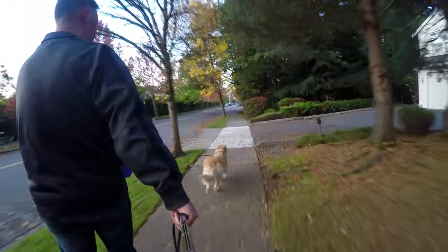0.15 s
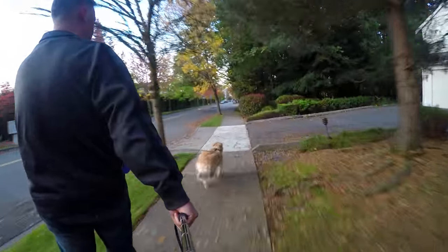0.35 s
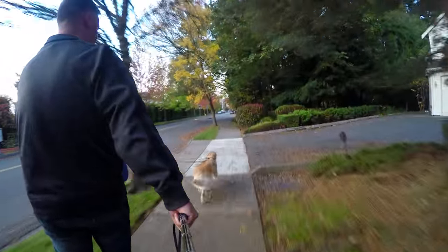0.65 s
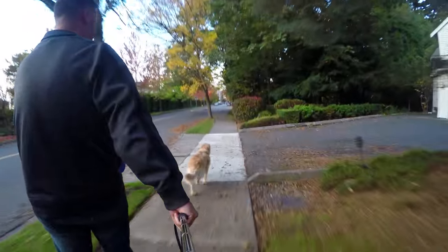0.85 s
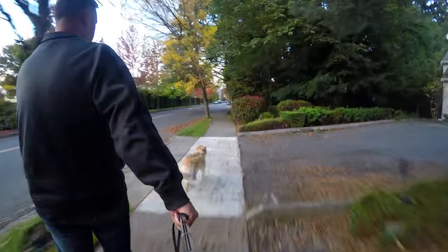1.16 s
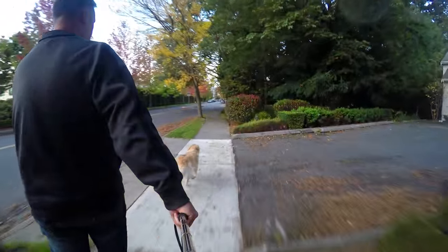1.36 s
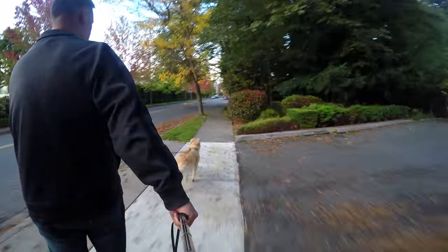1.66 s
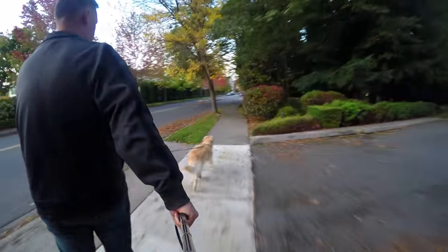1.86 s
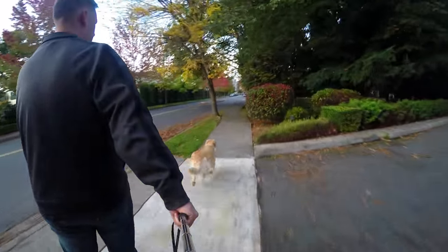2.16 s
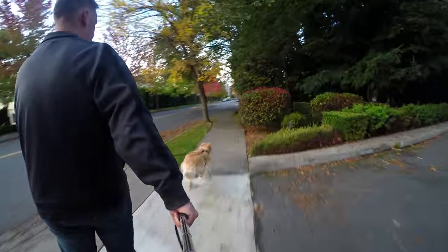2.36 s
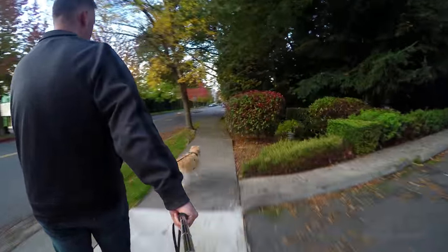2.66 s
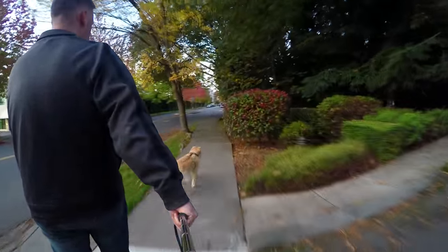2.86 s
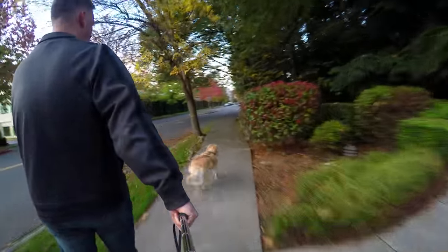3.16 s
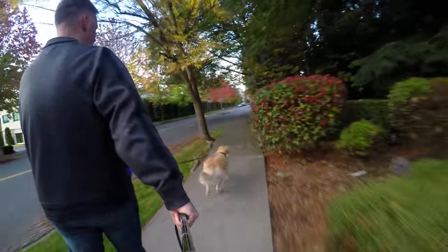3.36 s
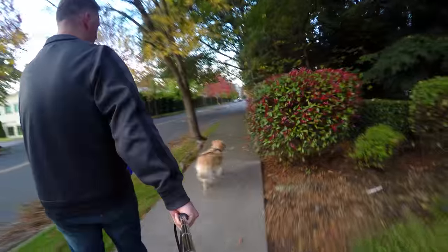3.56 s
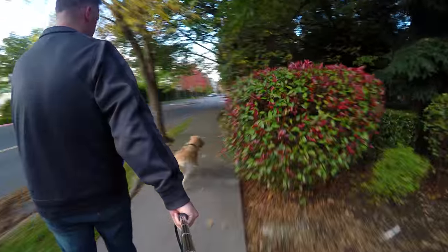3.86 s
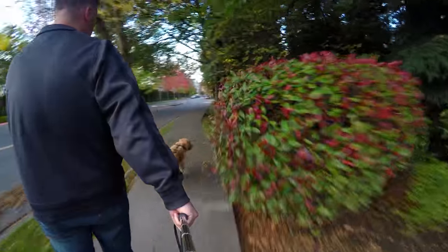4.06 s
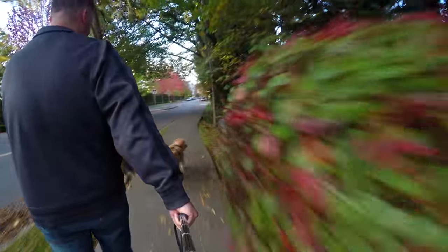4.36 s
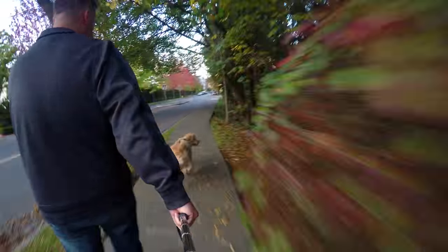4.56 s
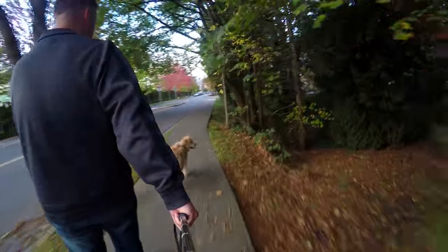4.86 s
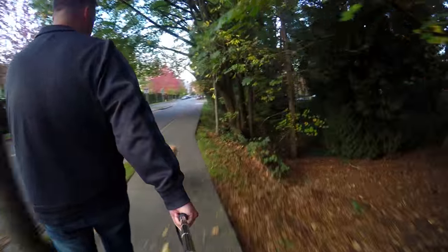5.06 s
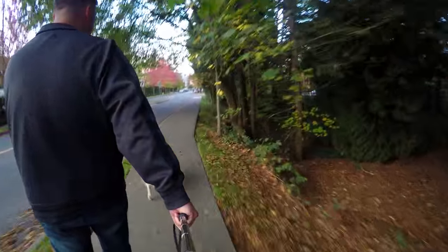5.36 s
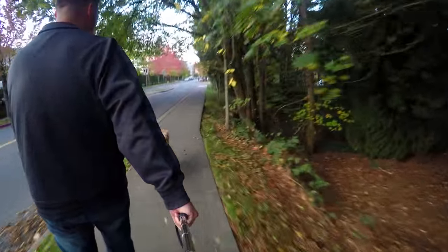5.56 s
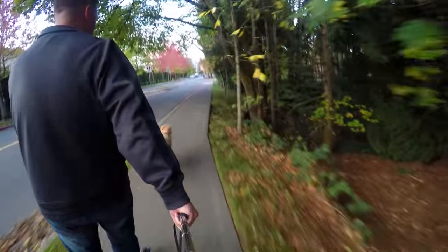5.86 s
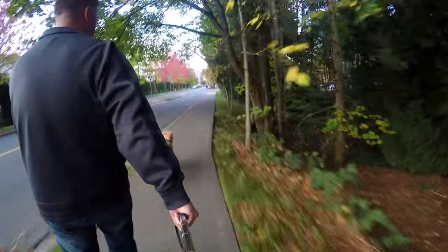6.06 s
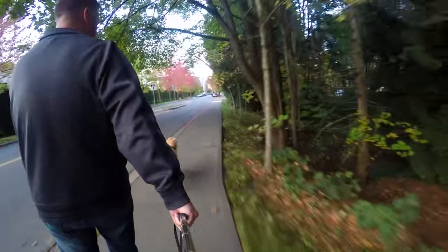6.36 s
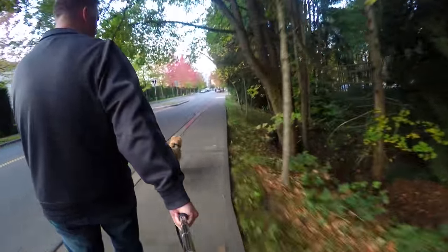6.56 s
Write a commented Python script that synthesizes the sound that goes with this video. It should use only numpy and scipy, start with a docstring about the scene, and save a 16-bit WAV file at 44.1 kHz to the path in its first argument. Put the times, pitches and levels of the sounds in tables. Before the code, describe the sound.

A longboard rolls without stopping along a gritty concrete sidewalk, heard close from a camera carried by the rider. A midrange wheel hum wavers throughout under a fine hiss. From 0 to 2 seconds grit and leaf fragments crackle, fizzing hardest around 0.5, with leaf snaps near 0.7, 0.85 and 1.2. A strong joint bump hits at 0.3, rear wheels following 0.2 seconds later, with a deck knock and clacks; another pair comes at 1.07, and a sharp clack at 1.3. From 2 to 3.5 the roll is quieter, with softer bumps at 2.3 and 3.0. Firmer double bumps return at 3.75, 4.5, 5.24 and 6.0, with a heavy knock at 5.24 and a bright clack at 6.23. Brief bearing sizzles, small leaf snaps, low shaking rumble and jolts continue to the end, with very faint street wash.

```python
"""Wheels hum and hiss over a gritty concrete sidewalk: a longboard, heard from a camera the rider carries.
Leaves snap, bearings sizzle, trucks clack and the deck knocks; slab joints bump front pair, then rear.
Contacts are noise bursts and the roll is steady noise, coloured by resonances of board and camera case.
Shaking adds a low rumble and short jolts; faint echoes and a distant street wash surround the board."""
import sys
import numpy as np
from scipy import signal
from scipy.fft import rfft, irfft
from scipy.io import wavfile
from scipy.ndimage import uniform_filter1d

SR = 44100
rng = np.random.default_rng(int(sys.argv[2]) if len(sys.argv) > 2 else 0)


def dump_mix(stems):
    """Bounce the given channels to the path in sys.argv[1] as a 16-bit WAV at rate SR."""
    frames = np.atleast_2d(stems).T  # one column per channel
    limited = np.clip(frames, -1, 1)  # hard clip at full scale
    pcm = np.round(limited * 32767).astype(np.int16)
    wavfile.write(sys.argv[1], SR, pcm)


N = 295470

# resonances of the board and camera case, which colour every contact: pitch_hz, width_hz, level_db
BODY_RESONANCES = [(130, 160, -2.5), (251, 190, -2), (381, 77, -0.5), (566.4, 76, 4.5), (705, 255, 0.5),
                   (843, 124, -2.5), (1072, 140, 2), (1173, 117, 0.5), (1448, 170, -4), (1662, 243, 0.5),
                   (1900, 220, -6.5), (2090, 177, -5.5), (2366, 270, -5.5), (2613, 175, -1.5),
                   (2882, 170, -1.5), (3100, 162, -0.5), (3560, 260, 1), (3844, 197, 4), (4208, 266, 6.5),
                   (4595, 740, -4), (5120, 1170, -14.5), (6500, 760, -18), (7454, 560, -13.5),
                   (8570, 2900, -24), (10390, 590, -19), (11500, 1200, -27), (13700, 2800, -30)]
# ground under the wheels, before the layer trims:
# start_s, wheel hum level_db, grit fizz level_db, crackle over fizz level_db
GROUND = [(0, -55.5, -59, 2), (.47, -53, -51, -8.5), (.85, -55, -57, -6.5), (1.32, -55.5, -55, -0.5),
          (1.65, -55, -57.5, -1.5), (1.95, -58, -60, -0.5), (2.7, -57.5, -65, -4),
          (3.05, -56.5, -58.5, -2.5), (4.1, -55, -65.5, -9), (4.7, -54.5, -58, -9), (5.9, -56, -63.5, -12),
          (6.7, -53.5, -68, -5)]
# slab joints and rough patches, before the axle offsets: start_s, rear lag_s, front level_db, front length_s,
# rear level_db, rear length_s, brightness_db_per_octave, deck boom_db, camera jolt_db
SLAB_JOINTS = [(0.31, .208, -31, 0.0076, -35, 0.0305, -0.4, -0.5, -34.5),
               (1.068, 0.22, -34.5, 0.025, -35, 0.02, -1.7, -3, -31.5),
               (1.54, 0.2, -40, 0.018, -44, 0.035, -0.2, 3.5, -41.5),
               (2.281, .2, -42, 0.014, -47, 0.023, 0.9, 4, -43),
               (2.3, 0.21, -49, 0.017, -47.5, 0.019, -1.7, 3, -48),
               (3.017, 0.2, -40.5, 0.0069, -47, 0.0083, 1.5, 6, -54),
               (3.045, 0.2, -41.5, 0.015, -47.5, 0.04, .5, 7, -47.5),
               (3.38, 0.22, -46, 0.024, -46, 0.02, -0.8, 4.5, -45),
               (3.747, 0.22, -36, 0.027, -35.5, 0.031, -0.9, -1, -29),
               (4.485, .213, -37.5, 0.0208, -33, 0.0212, -0.9, 1, -47),
               (5.234, 0.26, -35, 0.0064, -34, 0.015, -1.6, -6, -35),
               (5.245, .258, -36.5, 0.026, -49, 0.0091, -0.9, 3, -30),
               (5.635, 0.22, -48, 0.023, -51, 0.022, -1, 0, -50),
               (5.995, .217, -34.5, 0.0266, -33.5, .024, 0.5, 7.5, -34)]
# knocks of the deck, before a shared gain: start_s, level_db, brightness_db_per_octave
DECK_KNOCKS = [(0.3138, -16, .5), (1.077, -23, 3), (1.298, -29, -1.5), (1.5456, -24.5, -1.5),
               (2.309, -25, -.5), (3.756, -29.5, -4.5), (5.242, -14.5, -1.5)]
# hard clacks of loose truck hardware, before a shared gain: start_s, level_db
TRUCK_CLACKS = [(.2543, -26), (0.3152, -26), (0.33, -22.5), (.414, -31), (0.4392, -31), (0.5439, -18.5),
                (1.2966, -18), (2.3173, -21.5), (3.019, -18), (3.0711, -23), (3.2773, -31), (3.755, -18),
                (3.7673, -21.5), (5.5088, -27), (6.0235, -21.5), (6.2334, -16)]
# big dry leaves snapping, before a shared gain: start_s, level_db
BIG_LEAVES = [(0.0778, -29.5), (0.7047, -26), (0.8501, -22), (1.2238, -28.5), (1.819, -36), (1.9659, -33.5),
              (3.338, -33.5), (3.8096, -28.5), (5.029, -35), (5.1427, -34), (5.4544, -30), (5.612, -31),
              (5.873, -29)]
# brief sizzles of the bearings, before the flutter: start_s, level_db, length_s
BEARING_SIZZLES = [(0.239, -52, 0.025), (0.898, -60.5, 0.099), (2.534, -61, .16), (4.12, -56, 0.041),
                   (4.817, -53, 0.065), (5.39, -53, 0.012), (6.333, -52, 0.062)]
# relative spectra of the forces that drive the body: pitch_hz, level_db
HUM_FORCE = [(60, -10.5), (130, 16), (220, 5), (400, -1.5), (700, -3), (1500, 4), (2500, 2), (4200, -11),
             (6000, -7), (15000, -25)]
GRIT_FORCE = [(100, -72), (1000, -35), (2500, -12.5), (4500, 4), (7000, 12.5), (15000, 14)]
SCUFF_FORCE = [(50, -11), (130, 6.5), (300, 3), (600, -0.5), (1100, 2.5), (1700, 0), (2800, 3), (4000, -3),
               (6500, 2), (15000, -3)]
KNOCK_FORCE = [(100, 4), (500, -9), (1100, 5.5), (1650, 4), (2600, 4.5), (4200, -6.5), (6800, 7),
               (9000, -7.5), (15000, 0)]
CLACK_FORCE = [(100, -14), (1000, -9), (2000, -4), (3000, 2.5), (3800, 5.5), (4600, 2.5), (6500, 0),
               (15000, -13)]
SNAP_FORCE = [(100, -18), (1500, -13.5), (2600, -1), (3800, -8), (5200, 0.5), (8000, 6.5), (11000, 3.5),
              (15000, 5)]
# relative spectrum of the distant street wash: pitch_hz, level_db
AIR_SPECTRUM = [(100, -44.5), (300, -68), (1000, -62), (3000, -85), (6000, -68), (15000, -75.5)]
# strength of the camera rumble on uneven slabs, before the layer trims: start_s, level_db
RUMBLE_LEVEL = [(0, -41.5), (1, -39), (1.2, -34.5), (1.5, -40), (2.3, -42), (3.4, -41), (3.8, -38),
                (4.4, -40.5), (4.7, -38.5), (5.1, -41.5), (5.3, -38), (6.3, -38.5), (6.55, -41.5)]
# axle offsets: brightness_db_per_octave, nose_over_tail_db, deck boom_db, camera jolt_db
FRONT_AXLE, REAR_AXLE = (.5, -0.5, 0, -3), (-0.2, -3.9, 2.1, 1.6)

EDGE_HZ = 15500  # upper limit of the camera
NOSE_HZ, TAIL_HZ, END_WIDTH_HZ = 1720, 1160, 120  # the two ends of the deck ring here
BOOM_HZ, BOOM_WIDTH_HZ = 242, 105  # the whole deck flexes here
HUM_BAND_HZ, FIZZ_BAND_HZ = (500, 2500), (5500, 13000)  # bands in which the layers are levelled
TIME = np.arange(N) / SR
HZ = np.fft.rfftfreq(4096, 1 / SR)


def amp(db):
    """Decibels as an amplitude gain."""
    return 10 ** (np.asarray(db) / 20)


def evened(x):
    """Scale a sound to rms 1."""
    return x / np.sqrt(np.mean(x ** 2) + 1e-20)


def read(points, hz):
    """A spectrum in dB, joined by straight lines over log frequency."""
    point_hz, db = np.transpose(points)
    return np.interp(np.log(hz + 1), np.log(point_hz), db)


def level(table, column):
    """One dB column of a timed table, as a gain for every sample."""
    rows = np.array(table)
    return amp(np.interp(TIME, rows[:, 0], rows[:, column]))


def add(mix, start_s, sound):
    """Lay a sound into the mix in place, cut off at the end."""
    part = mix[max(round(start_s * SR), 0):][:len(sound)]
    part += sound[:len(part)]


def noise(gain):
    """Noise of rms 1 whose spectrum follows gain(Hz)."""
    spectrum = rfft(rng.standard_normal(N))
    return evened(irfft(spectrum * gain(np.fft.rfftfreq(N, 1 / SR)), N))


def wander(rate_hz):
    """A random curve of rms 1, with little movement faster than rate_hz."""
    return noise(lambda f: 1 / (1 + (f / rate_hz) ** 4))


def band_rms(x, band_hz):
    """Loudness of a sound inside one band."""
    bandpass = signal.butter(2, band_hz, "bandpass", fs=SR, output="sos")
    return np.std(signal.sosfilt(bandpass, x))


def varied(force, colour_db):
    """No two contacts are alike: the same force spectrum with a few chance peaks and dips."""
    bands_hz = np.geomspace(100, 15000, 36)
    return np.c_[bands_hz, read(force, bands_hz) + colour_db * rng.standard_normal(len(bands_hz))]


def ring(force, tilt=0, nose_db=0, boom_db=0):
    """Causal response of the body to one tap with the given force spectrum; energy 1."""
    def peak(hz, width_hz):
        return 1 / (1 + ((HZ - hz) / width_hz) ** 2)
    power = sum(amp(db) ** 2 * peak(hz, width_hz) ** 4 for hz, width_hz, db in BODY_RESONANCES)
    # below zero, nose_db makes the tail ring more
    ends = nose_db * (peak(NOSE_HZ, END_WIDTH_HZ) - peak(TAIL_HZ, END_WIDTH_HZ))
    boom = boom_db * peak(BOOM_HZ, BOOM_WIDTH_HZ)
    brightness = tilt * np.log2(np.maximum(HZ, 200))
    gain = np.sqrt(power + 1e-6) * amp(read(force, HZ) + ends + boom + brightness)
    # minimum phase: the sound starts at once and dies away
    log_gain = np.log(np.r_[gain, gain[-2:0:-1]] + 1e-9)
    tap = np.fft.ifft(np.exp(np.conj(signal.hilbert(log_gain)))).real
    return tap / np.linalg.norm(tap)


def chatter(shape, count=4):
    """A cluster of tiny blows under an envelope, with no pitch of its own; energy 1."""
    blows = shape * rng.standard_normal(len(shape))
    for _ in range(count):  # even out the spectrum, then restore the envelope
        spectrum = rfft(blows)
        blows = irfft(spectrum / (abs(spectrum) + 1e-12), len(shape))
        blows = blows * shape / np.sqrt(abs(uniform_filter1d(blows ** 2, size=48)) + 1e-12)
    return blows / np.linalg.norm(blows)


def strike(tap, swell_s, trail, trail_s):
    """One blow swells over swell_s, then the touching parts chatter on and ring the body; energy 1."""
    t = np.arange(SR // 20) / SR
    blow = (t / swell_s) ** 2 * np.exp(2 - 2 * t / swell_s)
    after = trail * np.minimum(t / swell_s, 1) * np.exp(-t / trail_s)
    sound = signal.fftconvolve(chatter(blow + after), tap)
    return sound / np.linalg.norm(sound)


def scattered(per_s, over_db, spread_db):
    """Small events at random moments, louder where the grit fizzes more: (start_s, level_db)."""
    ground = np.array(GROUND)
    chance = rng.random((int(per_s * N / SR), 2))
    times = (np.arange(len(chance)) + chance[:, 0]) / per_s
    fizz_db = np.interp(times, ground[:, 0], ground[:, 2])
    return list(zip(times, fizz_db + over_db - spread_db * chance[:, 1]))


def crossings():
    """Each joint met by both axles: start_s, level_db, length_s, brightness, nose_db, boom_db, jolt_db."""
    for start_s, lag_s, front_db, front_s, rear_db, rear_s, tilt, boom_db, jolt_db in SLAB_JOINTS:
        front = start_s, front_db, front_s, FRONT_AXLE
        rear = start_s + lag_s, rear_db, rear_s, REAR_AXLE
        for at_s, db, length_s, axle in (front, rear):
            yield at_s, db, length_s, tilt + axle[0], axle[1], boom_db + axle[2], jolt_db + axle[3]


def rolling(rough_db=1.5, waver_db=3.0, fizz_db=-7, surge_db=5.0):
    """Rough concrete drives the wheels: a hum and a hiss, each with its own colour and swells."""
    hum = np.zeros(N)
    for tilt in np.linspace(-1, 1, 4):  # four textures from dull to bright, swelling separately
        texture = rng.standard_normal(N) * amp(rough_db * wander(45) + waver_db * wander(7.6))
        hum += signal.oaconvolve(texture, ring(varied(HUM_FORCE, colour_db=2.0), tilt))[:N]
    hum *= level(GROUND, column=1) / band_rms(hum, HUM_BAND_HZ)
    surging = rng.standard_normal(N) * amp(surge_db * wander(53))
    fizz = signal.oaconvolve(surging, ring(GRIT_FORCE))[:N]
    fizz *= level(GROUND, column=2) / band_rms(fizz, FIZZ_BAND_HZ)
    return hum + amp(fizz_db) * fizz


def grit(grains_per_s=170, spread_db=5.5, crush_s=0.0013, tilt_spread=4.8, clump_db=4, gain_db=-8):
    """Grains of sand and bits of leaf are crushed in clumps, each kind with its own colour."""
    out, t, kinds = np.zeros(N), np.arange(SR // 80) / SR, range(24)
    density = grains_per_s * amp(clump_db * wander(22))
    for _ in kinds:
        hit = rng.random(N) < density / len(kinds) / SR
        sizes = amp(spread_db * np.minimum(rng.exponential(1, N), 3))
        crush = rng.standard_normal(len(t)) * np.sqrt(t / crush_s) * np.exp(-t / crush_s)
        tilt = tilt_spread * rng.uniform(-0.14, 1)
        grain = signal.fftconvolve(evened(crush), ring(varied(GRIT_FORCE, colour_db=6.5), tilt))
        out += signal.oaconvolve(hit * sizes, grain)[:N]
    out /= band_rms(out, FIZZ_BAND_HZ)
    return amp(gain_db) * level(GROUND, column=2) * level(GROUND, column=3) * out


def rumble(sway_hz=35.4, sway_width_hz=17, judder_hz=80, judder_width_hz=26, sway_db=-1, judder_db=-9,
           lurch_db=3.0, lumps_db=5.5):
    """Two low resonances of the camera mount, kept going in lumps by the uneven ground."""
    def shaken(hz, width_hz):
        swing = signal.hilbert(noise(lambda f: f / (f + hz) / (1 + ((f - hz) / width_hz) ** 2) ** 2))
        return evened(swing.real / np.sqrt(abs(swing) + 1.6))  # large swings are damped most
    sway = amp(sway_db + lurch_db * np.tanh(wander(11.6))) * shaken(sway_hz, sway_width_hz)
    judder = amp(judder_db + lumps_db * np.tanh(wander(14.5))) * shaken(judder_hz, judder_width_hz)
    return (sway + judder) * level(RUMBLE_LEVEL, column=1)


def distant_street(level_db=-64.0):
    """Distant street wash: steady noise with a fixed spectrum."""
    return amp(level_db) * noise(lambda f: amp(read(AIR_SPECTRUM, f)))


def leaves(swell_s=0.0017, trail=3.4, crumble_s=0.0075, colour_db=4.0, gain_db=10.5):
    """Dry leaves snap and crumble, each coloured by chance; small ones are scattered among the big."""
    out = np.zeros(N)
    for start_s, db in BIG_LEAVES + scattered(per_s=1.6, over_db=19, spread_db=21):
        snap = strike(ring(varied(SNAP_FORCE, colour_db)), swell_s, trail, crumble_s)
        add(out, start_s, amp(db + gain_db) * snap)
    return out


def bearings(centre_hz=4280, width_hz=600, flutter_db=3):
    """Short, fluttering spells of metallic sizzle: noise around one pitch."""
    out = np.zeros(N)
    for start_s, db, length_s in BEARING_SIZZLES:
        count = int(length_s * SR)
        hiss = noise(lambda f: 1 / (1 + ((f - centre_hz) / width_hz) ** 2))[:count]
        add(out, start_s, amp(db) * hiss * signal.windows.tukey(count, .5))
    return out * amp(flutter_db * wander(180))


def clacks(swell_s=0.00122, gain_db=11.0, rebound_s=0.013, rebound_db=-16):
    """Bright metal clacks of the trucks: each hard one rebounds once, and light rattles fall in between."""
    out, tap = np.zeros(N), ring(CLACK_FORCE)
    rebounds = [(start_s + rebound_s * rng.uniform(0.6, 2), db + rebound_db) for start_s, db in TRUCK_CLACKS]
    rattles = scattered(per_s=2.2, over_db=24, spread_db=6)
    for start_s, db in TRUCK_CLACKS + rebounds + rattles:
        clack = strike(tap, swell_s, trail=.35, trail_s=.0045)
        add(out, start_s, amp(db + gain_db) * clack)
    return out


def joints(rise_s=0.0021, fall_s=0.0011, sag_db=4, blow_s=0.0016, scuff=0.45, colour_db=2.0):
    """Left and right wheel each hit both edges of the gap, scuffing in between."""
    out, t = np.zeros(N), np.arange(SR // 12) / SR
    for start_s, db, length_s, tilt, nose_db, boom_db, _ in crossings():
        contact = np.minimum(t / rise_s, 1) * np.exp(-np.maximum(t - length_s, 0) / fall_s)
        moments = length_s * (np.arange(4) + rng.uniform(.45, .8, 4)) / 4
        blows = sum(np.exp(-((t - moment) / blow_s) ** 2) for moment in moments)
        shape = (blows + scuff * contact) * amp(-sag_db * t / length_s)
        tap = ring(varied(SCUFF_FORCE, colour_db), tilt, nose_db, boom_db)
        bump = signal.fftconvolve(chatter(shape, count=1), tap)
        bump *= np.sqrt(length_s * SR) / np.linalg.norm(bump)  # longer bumps carry more energy
        add(out, start_s, amp(db) * bump)
    return out


def knocks(swell_s=0.0012, trail=0.33, trail_s=0.0062, gain_db=16):
    """The deck's hard, woody knock: a short blow that rings the nose and little of the boom."""
    out = np.zeros(N)
    for start_s, db, tilt in DECK_KNOCKS:
        tap = ring(varied(KNOCK_FORCE, colour_db=1.5), tilt, nose_db=7, boom_db=-10)
        add(out, start_s, amp(db + gain_db) * strike(tap, swell_s, trail, trail_s))
    return out


def jolts(hz=79, spread_hz=4, delay_s=.012, swell_s=0.021):
    """Each bump passes through the rider to the camera, and the mount swings for a few cycles."""
    out, t = np.zeros(N), np.arange(SR // 4) / SR
    for start_s, *_, jolt_db in crossings():
        swing = np.sin(2 * np.pi * (hz + spread_hz * rng.uniform(-0.87, 1)) * t)
        swell = t / swell_s * np.exp(1 - t / swell_s)
        add(out, start_s + delay_s, amp(jolt_db) * swell * swing)
    return out


def street_echoes(x, t60_s=0.083, wet_db=-14, dull_hz=4500):
    """Add faint scattered echoes from the ground, the rider and the hedges."""
    t = np.arange(SR // 2) / SR
    sparse = rng.standard_normal(len(t)) * (rng.random(len(t)) < .06)
    tail = sparse * amp(-60 * t / t60_s) * (t > .005)
    tail = signal.lfilter([1], [1, -np.exp(-2 * np.pi * dull_hz / SR)], tail)  # soften the treble
    return x + amp(wet_db) * signal.oaconvolve(x, tail / np.linalg.norm(tail))[:N]


def scene():
    """Board, mount and street at one microphone."""
    contacts = grit() + leaves() + bearings() + clacks() + joints() + knocks()
    board = street_echoes(contacts)
    return (board + rolling() + rumble() + distant_street() + jolts())[None]


def record(dry):
    """The camera's band limit: a steep low-pass."""
    lowpass = signal.firwin(401, EDGE_HZ, window=("kaiser", 8), fs=SR)
    return signal.oaconvolve(dry, lowpass[None], "same")


dry = scene()
out = record(dry)
dump_mix(out)
```